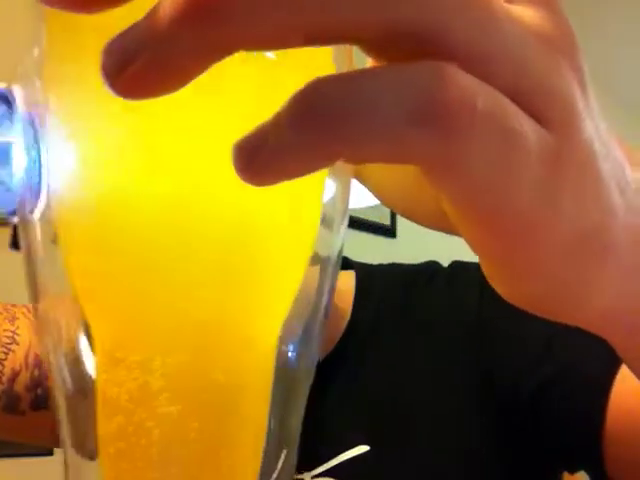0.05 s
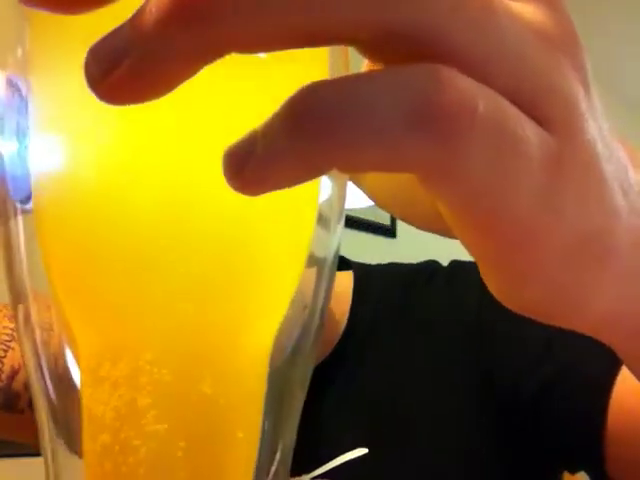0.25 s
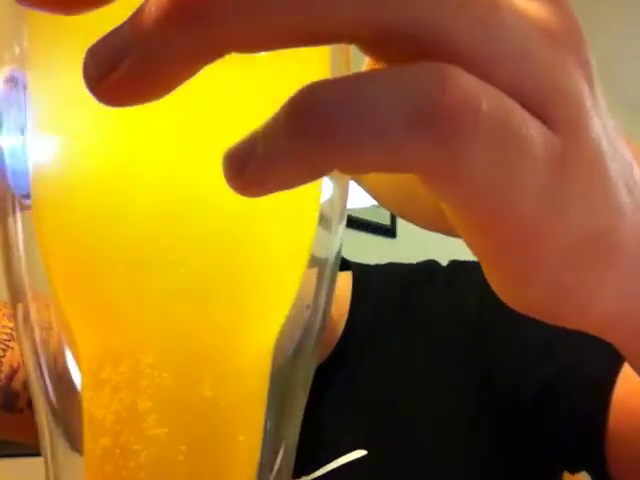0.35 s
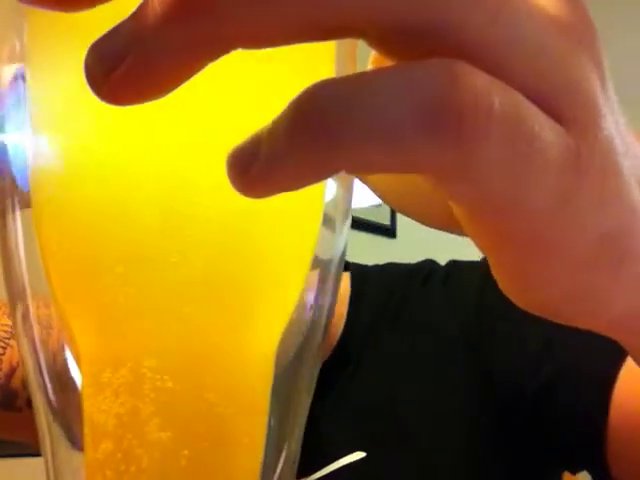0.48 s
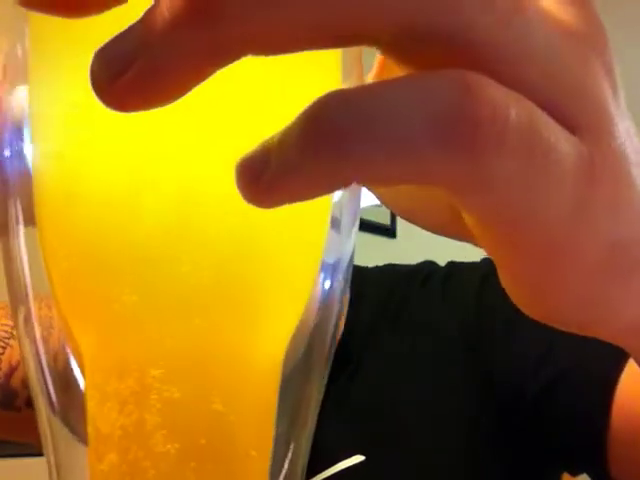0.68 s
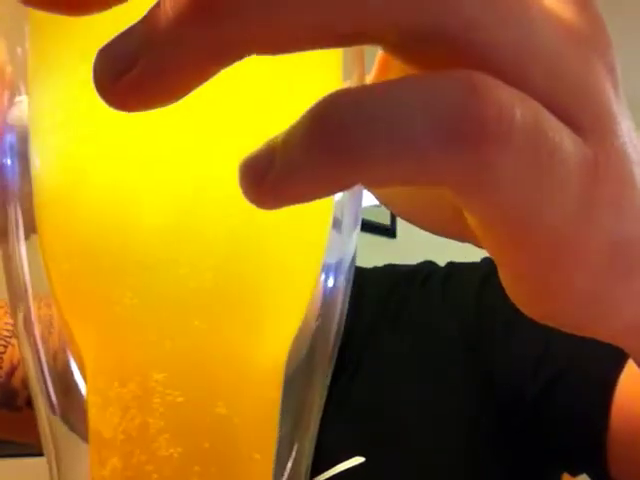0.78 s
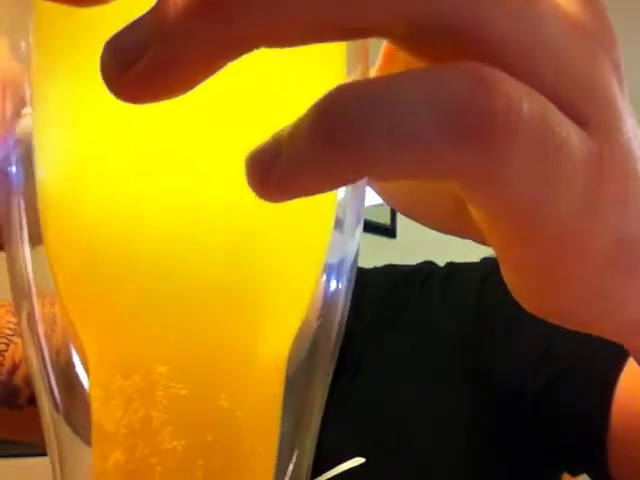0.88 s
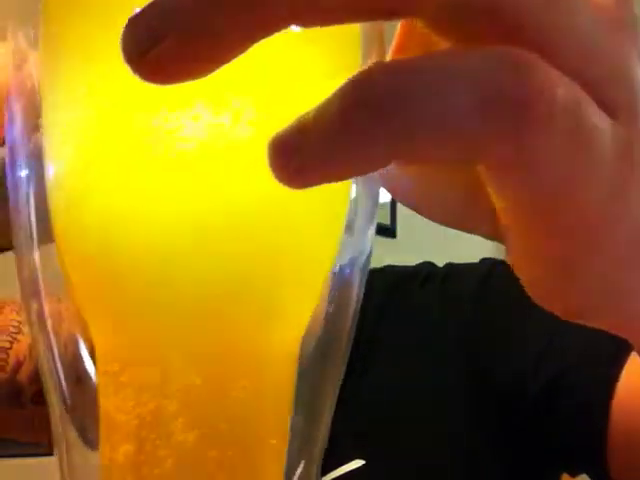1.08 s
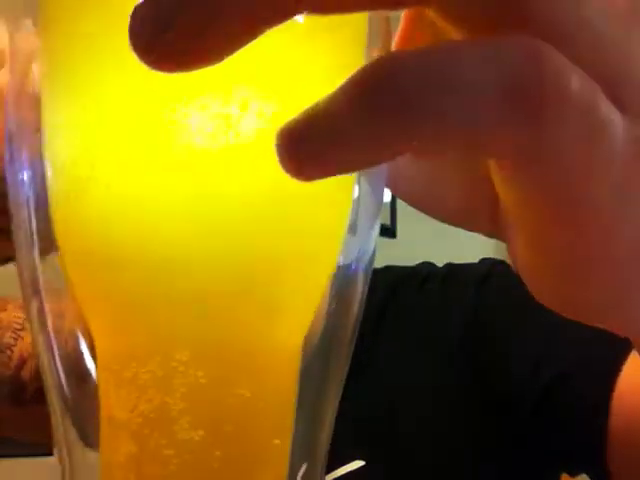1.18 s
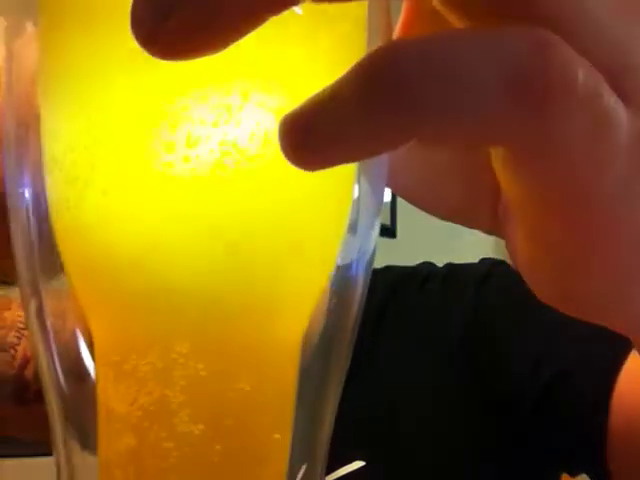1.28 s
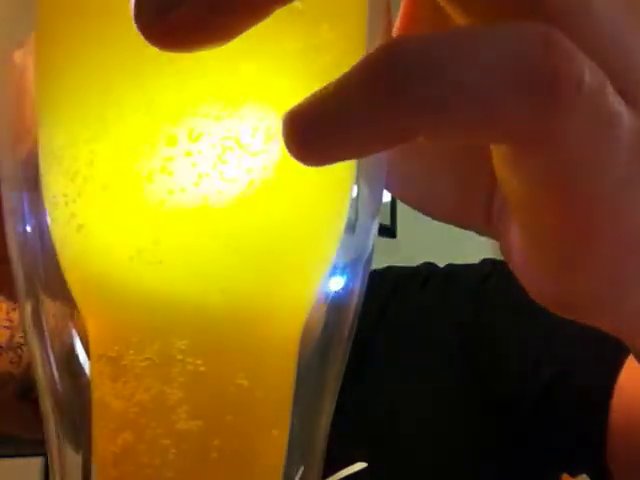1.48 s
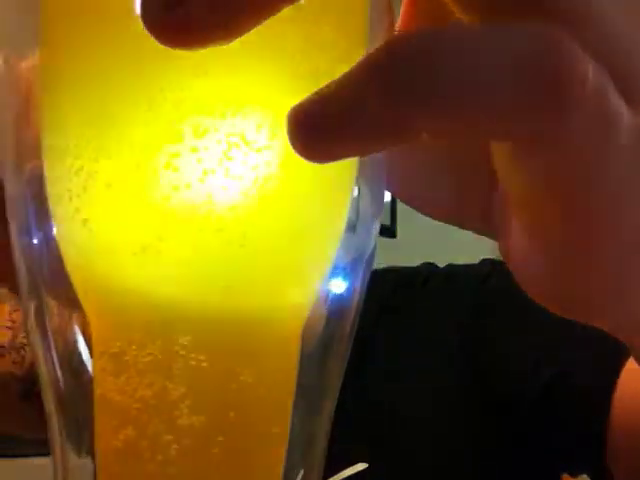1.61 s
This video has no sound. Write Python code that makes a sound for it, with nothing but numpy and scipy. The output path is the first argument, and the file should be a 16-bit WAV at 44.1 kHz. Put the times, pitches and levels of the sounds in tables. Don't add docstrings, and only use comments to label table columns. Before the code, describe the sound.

Three quick clinks of a small metal torch on a full drinking glass, each one quieter

```python
import sys
import numpy as np
from scipy import signal
from scipy.fft import rfft, irfft
from scipy.io import wavfile
from scipy.ndimage import uniform_filter1d

SR = 44100
rng = np.random.default_rng(int(sys.argv[2]) if len(sys.argv) > 2 else 0)


def wrap_up_sound(samples):
    columns = np.atleast_2d(samples).T
    tamed = np.clip(columns, -1, 1)
    steps = np.round(tamed * 32767).astype(np.int16)
    wavfile.write(sys.argv[1], SR, steps)


def undo_db(level):
    steps = np.asarray(level, float) / 20
    return 10 ** steps


N = 72765


def band(x, low_hz, high_hz, order):
    return signal.sosfilt(signal.butter(order, [low_hz, high_hz], "band", fs=SR, output="sos"), x)


def unit_energy(x):
    return x / np.sqrt(np.sum(x ** 2))


def since(start_s):
    i = int(np.ceil(start_s * SR))
    return i, (i + np.arange(SR // 3)) / SR - start_s


def ring(t, hz, db, t60, rise_s):
    size = undo_db(db[:, None] - 60 * t / t60[:, None])
    modes = size * np.sin(2 * np.pi * hz[:, None] * t)
    return modes.sum(axis=0) * (1 - np.exp(-t / rise_s)) ** 2


def wall(pushes, modes):
    scatter_db, grip_s = 3.5, 0.14
    out = np.zeros(N + SR)
    ratio, db, hold = np.array(modes).T
    chance = rng.standard_normal((20, len(modes)))
    for (start_s, level_db, pitch_hz, swell_s, t60_s), c in zip(pushes, chance):
        i, t = since(start_s)
        modes_db = level_db + db + scatter_db * c * (db < 0)
        grip = undo_db(-20 * (t / t60_s) * (t / grip_s))
        out[i:i + len(t)] += ring(t, pitch_hz * ratio, modes_db, t60_s * hold, swell_s) * grip
    return out[:N]


# frequency_hz, density_db [per Hz]
AIR_SPECTRUM = [(95, -31.5), (150, -11), (290, -5.5), (450, -13.5), (1150, -15.5), (3000, -26),
                (8000, -29.5), (15500, -32.5)]


def air():
    level_db, flicker_db = -61, -0.67
    hz = np.maximum(np.arange(N // 2 + 1) * SR / N, 1)
    table_hz, table_db = np.array(AIR_SPECTRUM).T
    spec = rfft(rng.standard_normal(N)) * undo_db(np.interp(np.log(hz), np.log(table_hz), table_db))
    out = 0
    k = SR // 12
    for octave in np.arange(4, 16):
        steps = np.repeat(rng.standard_normal(N // k + 1), k)
        walk = uniform_filter1d(steps, k)[:N]
        weight = np.clip(1 - abs(np.log2(hz) - octave), 0, 1)
        out = out + irfft(spec * weight, N) * undo_db(flicker_db * walk)
    return out * undo_db(level_db) / np.sqrt(np.mean(out ** 2))


# start_s, level_db
HAND_THUMPS = [
    (0.236, -56.5),
    (0.489, -60.5),
    (0.746, -61),
]


def hand():
    width_s = 0.0022
    t = np.arange(N) / SR
    return sum(undo_db(db) * np.exp(-((t - s) / width_s) ** 2) for s, db in HAND_THUMPS)


# pitch_ratio, level_db, decay_factor
RING_MODES = [(1, 0, 1), (.975, -32, 0.38), (1.075, -20.5, 1)]
# start_s, level_db, pitch_hz, swell_s, t60_s
RING_PUSHES = [(.2376, -11, 1598, 0.00081, 0.087), (.2425, -37, 1570, 0.0062, 0.03),
               (.262, -24, 1613, 0.0059, 0.13), (.279, -35.5, 1619, 0.003, 0.34),
               (.4782, -33, 1604, 0.00035, 0.097), (.484, -23.5, 1598, 0.0029, 0.069),
               (.501, -30.5, 1607, 0.0058, 0.13), (.535, -34, 1620, 0.0056, 0.091),
               (.686, -44.5, 1587, 0.0015, 0.47), (.7468, -27, 1621, 0.0051, 0.16),
               (.615, -60.5, 1590, .004, 0.23), (.94, -57, 1600, 0.0026, 0.053),
               (1.35, -57, 2050, 0.0014, 0.064)]


def ring_wall():
    return wall(RING_PUSHES, RING_MODES)


# frequency_hz, level_db, t60_s
TICK_MODES = [(3830, -32, .012), (4187, -11.5, 0.029), (4470, -19.5, 0.02), (5040, -7, .022),
              (5180, -16.5, 0.019), (6160, -3, 0.019), (6356, -9, 0.027), (7930, -10, 0.026),
              (8580, -8.5, 0.013), (9000, -10, 0.011), (10100, -13.5, 0.015), (11400, -26, 0.0064),
              (12500, -25, 0.0084), (13600, -28, 0.0091)]
# frequency_hz, level_db, t60_s
KNOCK_MODES = [(932, -10, 0.023), (1254, -8, .05), (1334, -11.5, 0.059), (1457, -10, 0.058),
               (1800, -6.5, 0.057), (1907, -8, 0.067), (2008, -7.5, 0.041), (2273, 1, .014),
               (2450, -1.5, 0.013), (3000, -14, 0.015)]
# start_s, level_db, brightness_db [per octave], ring_length_factor
CONTACTS = [(0.2377, -22, -1.5, 0.86), (.248, -38, 7, 1.2), (.262, -34, 1, 0.92), (.2672, -39.5, 4.5, 0.79),
            (.272, -40, -8, 0.76), (.2782, -36.5, -7.5, 0.53), (.4782, -37, 5.5, 0.98),
            (.486, -43.5, 3, .7), (.4965, -43, -8, 0.56), (.5025, -78, 6, .8), (.513, -62, -14, 1.0),
            (.687, -60, -7, 1.2), (.7468, -41.5, -6, 0.88), (.753, -51.5, -18, 0.73), (.770, -65, 6, 1.3),
            (.781, -65, 0, 1.3), (.932, -59.5, 6, 1.04), (.940, -65.5, 18, 1.0), (.956, -60.5, 15, 0.87),
            (1.35, -62.5, -12, 0.74), (1.446, -58.5, 10.5, 0.89)]


def ticks():
    detune, scatter_db = 0.0087, 2.5
    out = np.zeros(N + SR)
    hz, db, t60 = np.array(TICK_MODES).T
    low_hz, low_db, low_t60 = np.array(KNOCK_MODES).T
    chance = rng.standard_normal((30, 4, 14))
    white = rng.standard_normal((30, SR // 3))
    grit = band(white, 3600, 10860, 2)
    for (start_s, level_db, tilt_db, hold), c, g, w in zip(CONTACTS, chance, grit, white):
        i, t = since(start_s)
        modes_db = db + scatter_db * c[1] + tilt_db * np.log2(hz / 6000)
        modes = ring(t, hz * (1 + detune * c[0]), modes_db, t60 * hold, rise_s=0.0001)
        scrape = unit_energy(w[::-1] * undo_db(-60 * t / 0.012))
        modes = modes + undo_db(-14) * signal.fftconvolve(modes, scrape)[:len(t)]
        knock_db = low_db + scatter_db * c[3, 4:] - 0.4 * tilt_db
        knock = ring(t, low_hz * (1 + detune * c[2, 4:]), knock_db, low_t60, rise_s=0.00094)
        grit_hz = np.clip(np.arange(len(t) // 2 + 1) * SR / len(t), 2000, None)
        g = irfft(rfft(g) * undo_db(tilt_db * np.log2(grit_hz / 6000)), len(t))
        crack = undo_db(2 - 60 * t / 0.0033)
        rattle = undo_db(-11 - 60 * t / 0.089 / hold)
        out[i:i + len(t)] += undo_db(level_db) * (modes + knock + g * (crack + rattle))
    return out[:N]


# pitch_ratio, level_db, decay_factor
LOW_MODES = [(1, 1.5, 0.9), (.955, -19.5, 2.1), (1.2, -23, 1.2)]
# start_s, level_db, pitch_hz, swell_s, t60_s
LOW_PUSHES = [(.2378, -11.5, 1109, 0.0028, 0.055), (.262, -25.5, 1125, 0.0023, .06),
              (.272, -25, 1074, 0.0026, 0.076), (.291, -36, 1067, 0.0043, 0.082),
              (.4782, -18, 1084, 0.0054, 0.056), (.499, -31.5, 1084, 0.001, 0.075),
              (.512, -30.5, 1104, .006, 0.058), (.687, -40, 1082, 0.0026, 0.053),
              (.7468, -20, 1118, 0.0041, 0.056), (.784, -34.5, 1115, 0.0033, 0.037),
              (.938, -51.5, 1108, 0.0029, 0.065)]


def low_wall():
    return wall(LOW_PUSHES, LOW_MODES)


# pitch_ratio, level_db, decay_factor
BODY_MODES = [(0.98, -0.5, 1.02), (0.91, -4.5, 1.14), (0.382, -9, 1.12)]
# start_s, level_db, pitch_hz, swell_s, t60_s
BODY_PUSHES = [
    (.2378, -35, 778, 0.0034, 0.095),
    (.26, -37, 788, 0.0035, 0.087),
    (.279, -43.5, 783, 0.004, 0.067),
    (.4782, -37.5, 812, 0.0013, 0.039),
    (.496, -45.5, 770, 0.0059, 0.061),
    (.7468, -48.5, 737, 0.0012, 0.055),
    (.77, -51, 536, 0.0046, 0.16),
]


def body():
    return wall(BODY_PUSHES, BODY_MODES)


def room(x):
    level_db, t60_s, lag_s = -18, 0.26, 0.012
    t = np.arange(SR // 2) / SR
    build = 1 - np.exp(-(t / lag_s) ** 2)
    tail = rng.standard_normal(len(t)) * undo_db(-60 * t / t60_s) * build
    tail = unit_energy(band(tail, 2500, 10600, 1))
    return signal.fftconvolve(x, tail)[:N] * undo_db(level_db)


def scene():
    glass = ticks() + low_wall() + ring_wall() + body()
    return (glass + room(glass) + hand() + air())[None]


# start_s, end_s, above_hz
TREBLE_LOSSES = [
    (.2235, .2325, 900),
    (.7345, .7435, 2400),
    (.4915, .4935, 8500),
]


def lose_treble(x):
    t = np.arange(N) / SR
    for start_s, end_s, above_hz in TREBLE_LOSSES:
        gate = uniform_filter1d(1. * ((t > start_s) & (t < end_s)), size=60)
        highpass = signal.butter(4, above_hz, "high", fs=SR, output="sos")
        x = x - gate * signal.sosfiltfilt(highpass, x)
    return x


def low_pass(x):
    return signal.sosfilt(signal.butter(12, 16830, fs=SR, output="sos"), x)


def record(dry):
    lowpass = signal.ellip(8, 0.2, 50, 15800, fs=SR, output="sos")
    mix = lose_treble(signal.sosfilt(lowpass, dry))
    return low_pass(mix)


dry = scene()
out = record(dry)
wrap_up_sound(out)
```